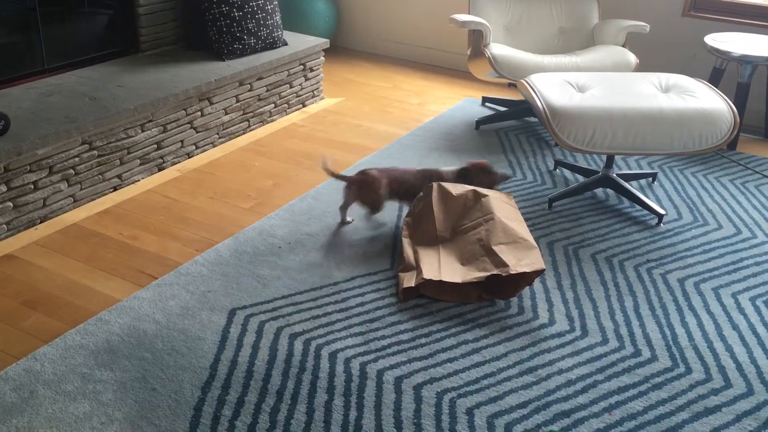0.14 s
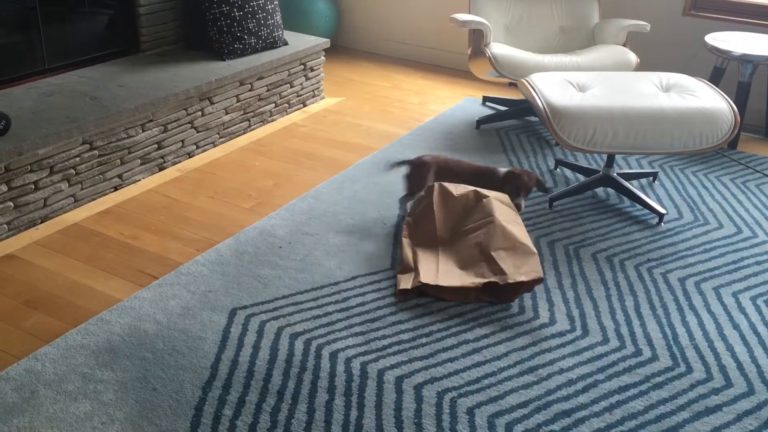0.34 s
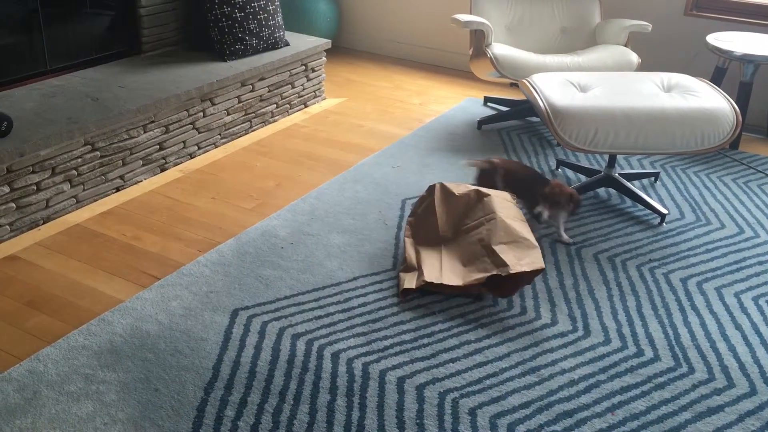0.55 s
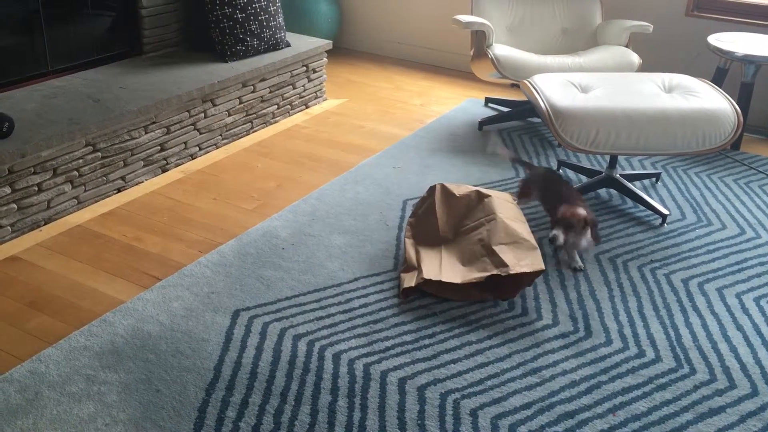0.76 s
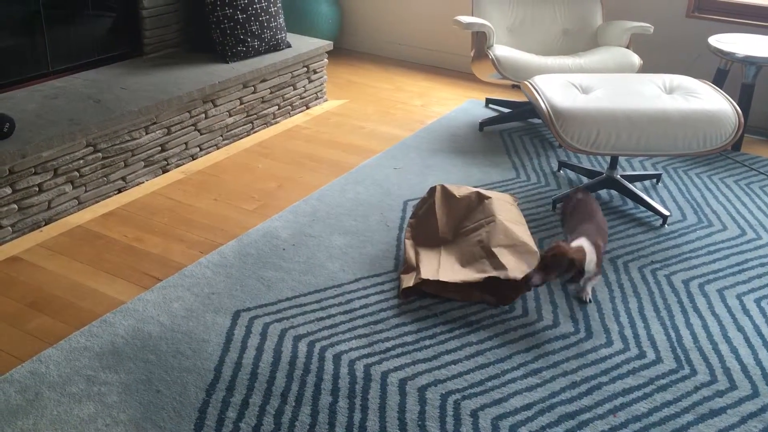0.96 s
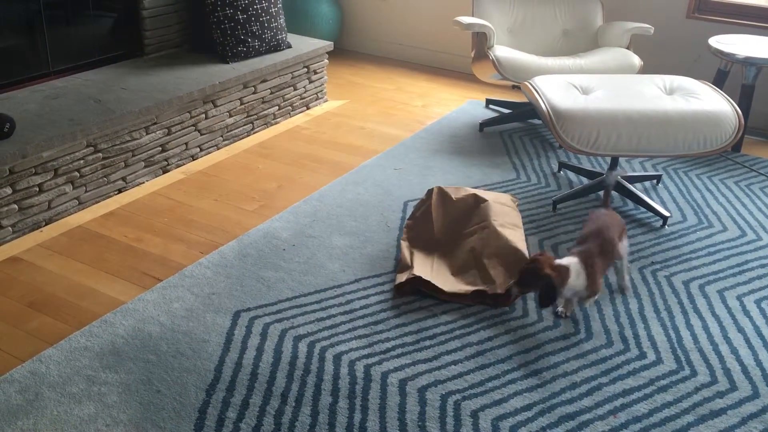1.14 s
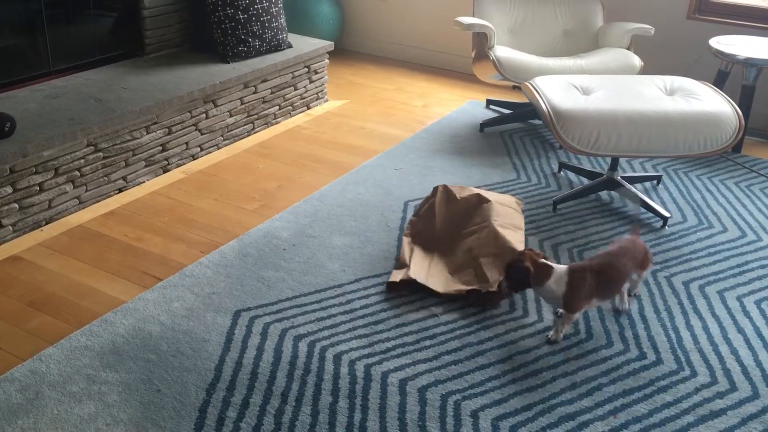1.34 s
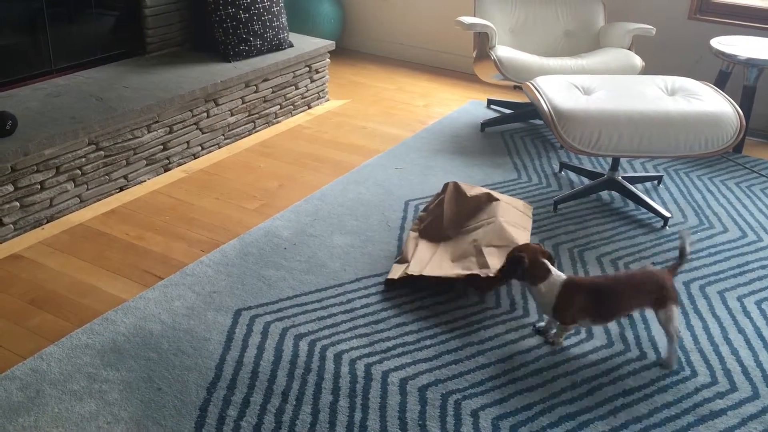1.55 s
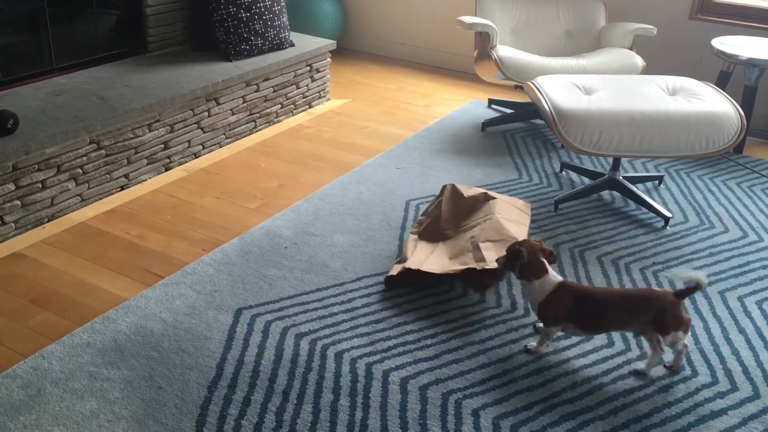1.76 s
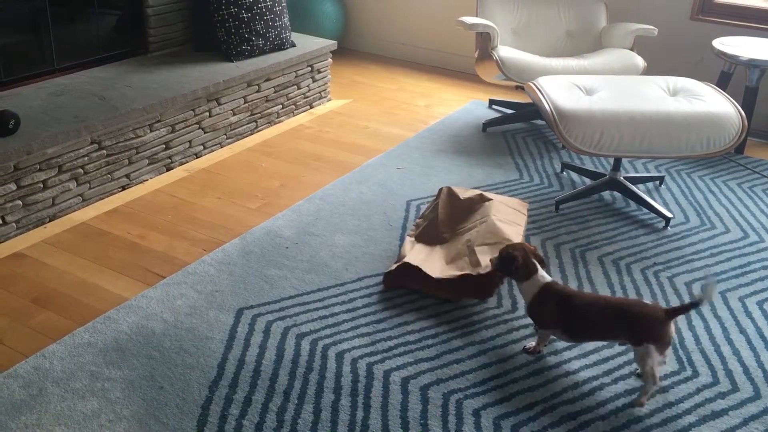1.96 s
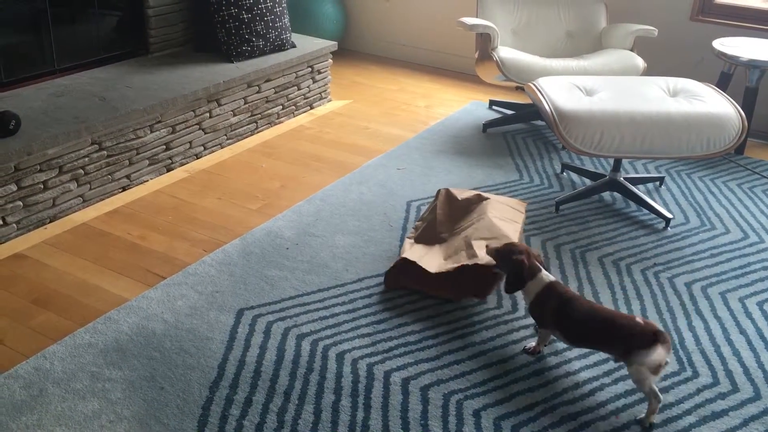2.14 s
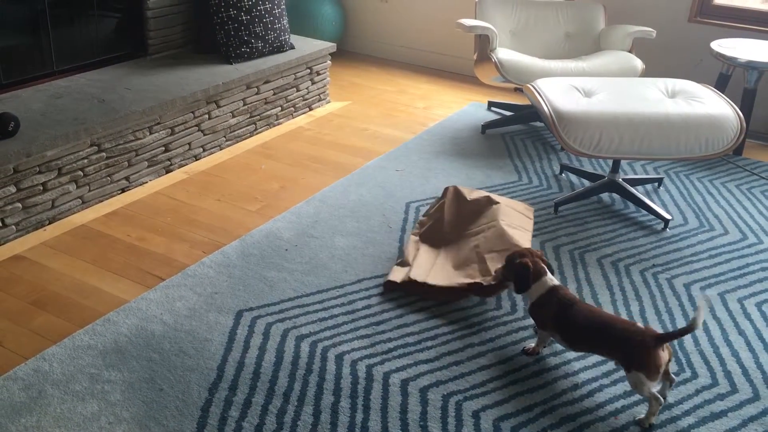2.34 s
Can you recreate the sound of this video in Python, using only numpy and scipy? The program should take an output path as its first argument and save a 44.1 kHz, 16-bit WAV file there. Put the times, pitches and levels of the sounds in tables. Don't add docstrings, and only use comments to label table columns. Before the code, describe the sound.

Single piercing puppy yap echoes in a hard room, followed by sniffing and paper bag crackling

```python
import sys
import numpy as np
from scipy import signal
from scipy.fft import rfft, irfft
from scipy.io import wavfile
from scipy.ndimage import uniform_filter1d

SR = 44100
rng = np.random.default_rng(int(sys.argv[2]) if len(sys.argv) > 2 else 0)


def master(y):
    cut = np.clip(np.atleast_2d(y).T, -1, 1)
    pcm = np.round(cut * 32767)
    wavfile.write(sys.argv[1], SR, pcm.astype(np.int16))


def attenuation_scalar(level_db):
    decades = np.asarray(level_db, float) / 20
    return 10 ** decades


N = 105840

# [f/Hz, level/dB]
AIR_COLOUR = [(20, -36), (45, -1.5), (90, -4.5), (250, -8.5), (700, -23), (2200, -16.5), (4500, -32.5),
              (15800, -42)]
AIR_DB = -57
# [t/s, level/dB]
STIR = [(0, 7), (.12, 0.5), (.25, -2.5), (.4, 3), (.7, 0.5), (.86, -3), (1.1, 3), (1.6, -3), (2.4, 0)]
OLD_YAP_HZ, OLD_YAP_WIDTH_HZ, OLD_YAP_DB, OLD_YAP_T60_S = 1720, 75, -50, 0.5

# [t/s, level/dB]
SWISH = [(0, -61.5), (.15, -76.5), (.4, -69), (.8, -67.5), (.86, -94.5), (.92, -80), (1.1, -63),
         (1.22, -59), (1.38, -61), (1.52, -55), (1.56, -71), (1.72, -60.5), (1.8, -104), (1.97, -59),
         (2.07, -76.5), (2.18, -92), (2.3, -70), (2.4, -66.5)]
# [f/Hz, level/dB]
PILE_COLOUR = [(1500, -2.5), (4000, -1), (9000, -4.5), (15800, -9)]
CLAW_S, CLAW_DB = .403, -47

# [t/s, peak level/dB, pitch f/Hz, time to fall 60 dB/s]
THUDS = [(0.022, -50.5, 61.8, 0.21), (0.101, -40.5, 58.4, 0.08), (0.339, -53.5, 202, .25),
         (0.498, -52, 71.5, 0.21), (0.572, -49.5, 84.7, 0.17), (1.087, -53.5, 224, 0.62),
         (1.43, -58.5, 109, 0.23), (1.606, -45.5, 289, 0.74), (1.606, -49, 139, 0.16),
         (1.661, -52, 400.6, 0.34), (1.987, -53, 176, 0.2), (2.305, -56.5, 276, 0.21)]
# [t/s, level/dB]
SCUFF = [
    (.22, -88.5),
    (.33, -51),
    (.62, -55.5),
    (.8, -66.5),
    (1.0, -74.5),
    (1.2, -88),
]
PUSH, PUSH_S, THUD_RISE_S = 1.5, .005, 0.0035

# [t/s, level/dB]
DRAG = [(.9, -104.5), (1.05, -59.5), (1.12, -50), (1.35, -55), (1.58, -54.5), (1.63, -42), (1.8, -57.5),
        (2.02, -46.5), (2.15, -58.5), (2.33, -46.5), (2.4, -51.5)]
# [f/Hz, level/dB]
RUSTLE_COLOUR = [(80, -14.5), (150, -11), (330, -7), (1100, -9), (2300, -20), (5000, -24.5), (15800, -47.5)]
GRAINS_PER_S, GRAIN_SPREAD_DB = 2300, 2.5

# [t/s, peak level/dB, pitch f/Hz, time to fall 60 dB/s]
SNAPS = [(1.0502, -36, 2500, 0.048), (1.0607, -28.5, 3650, 0.085), (1.0934, -32.5, 1180, 0.055),
         (1.2313, -36.5, 3120, 0.084), (1.4299, -40.5, 7900, 0.049), (1.5231, -39, 1110, 0.073),
         (1.5611, -38, 1286, 0.048), (1.5994, -45.5, 1160, 0.042), (1.6056, -26, 1290, 0.04),
         (1.637, -27.5, 1140, 0.082), (1.3004, -48, 2085, 0.031), (1.665, -44.5, 982, 0.044),
         (1.7068, -39, 1120, 0.089), (1.8835, -36, 3470, 0.048), (1.9612, -35.5, 4030, .08),
         (1.9682, -34, 1330, 0.14), (2.003, -30.5, 5500, 0.096), (2.027, -39, 5500, 0.075),
         (2.181, -35.5, 860, 0.14), (2.2472, -37.5, 2430, .035), (2.2703, -33, 3390, 0.082),
         (2.2969, -34, 1680, 0.1), (2.3142, -26.5, 1280, 0.075), (2.322, -33.5, 6000, 0.055),
         (2.3375, -27, 1640, .08), (2.3514, -32.5, 1200, 0.085), (2.376, -36.5, 1730, 0.068)]
# [f/Hz, level/dB]
PAPER_COLOUR = [(200, -53), (600, 5.5), (1300, 2.5), (3500, -0.5), (7000, -13), (15800, -32)]
SNAP_RISE_S, SNAP_RING = .0006, 0.66
TICK, TICK_S = .9, .002

# [start t/s, length/s, from f/Hz, to f/Hz, level/dB]
WHISTLES = [(.011, 0.022, 5830, 5070, -50), (.017, 0.025, 9820, 9560, -53.5),
            (.024, 0.0065, 12350, 10540, -54), (.15, 0.053, 5050, 5050, -67.5),
            (.194, 0.03, 12870, 13100, -44), (.26, 0.052, 6080, 6790, -42), (.902, .042, 4956, 5500, -46.5),
            (.905, .036, 9880, 11540, -61.5), (.986, 0.029, 15360, 15200, -60.5),
            (.956, 0.027, 5630, 5380, -49), (.984, 0.03, 5300, 5130, -51), (.85, 0.0086, 6320, 5500, -68.5)]
WHISTLE_FLUTTER = .45
# [t/s, pitch f/Hz, level/dB]
SQUEAK = [(.953, 11120, -79), (.959, 11270, -39), (0.968, 11000, -35), (.976, 11120, -35.5),
          (.984, 11100, -49.5), (0.992, 9920, -51.5), (1.004, 9570, -46), (1.013, 9500, -65)]
# [start t/s, length/s, level/dB]
SNIFFS = [
    (.0, 0.057, -52.5),
    (.19, 0.02, -45.5),
    (0.215, 0.031, -39.5),
    (0.901, 0.072, -56.5),
    (0.942, 0.11, -47.5),
    (1.06, 0.3, -60),
]
# [f/Hz, width/Hz, level/dB]
NOSTRILS = [(1430, 680, 10), (3280, 97, 14), (5500, 520, -14.5), (11500, 830, -21.5)]

# [t/s, pitch f/Hz, level/dB, overtone level/dB, break-up level/dB]
YAP = [
    (0.201, 1740, -54.5, -26, -45.5),
    (0.209, 1857, -7.5, -23, -45.5),
    (0.212, 1898, -12, -17.5, -33.5),
    (0.236, 1901, -7, -12.5, -17),
    (0.245, 1909, -7.5, -17.5, -14.5),
    (0.257, 1950, -12.5, -8, -5.5),
    (0.279, 2032, -22.5, -18, -7.5),
    (0.292, 1825, -10, -37.5, -21),
    (0.301, 1720, -55.5, -38, -24.5),
]
# [multiple of the pitch, level/dB, share of the break-up it follows]
OVERTONES = [(2, 3, 0), (3, -12, 0), (4, -26, .5), (5, -24, .05), (6, -35, .2), (7, -30, .1)]
SHAKE = .25
HALF_DB, THREE_HALF_DB = -14, -21
# [f/Hz, level/dB]
RASP_COLOUR = [(2590, -59), (4400, -33.5), (5940, 1.5), (6920, -10), (12500, -8.5), (15500, -22)]
RASP_S, RASP_RISE_S, RASP_FALL_S, RASP_PEAK_DB = .272, .036, 0.028, -37.5
# [f/Hz, level/dB]
YAP_COLOUR = [(650, -30), (880, 0), (21000, 0)]

# [f/Hz, time to fall 60 dB/s]
ROOM_T60 = [(100, 2.4), (500, 1.3), (1000, 2.01), (1900, 1.985), (3800, 1.14), (6000, 0.9), (11000, 0.59),
            (16000, 0.58)]
# [delay t/s, level/dB]
ECHOES = [(.005, -26), (0.046, -14.5), (.066, -15.5), (.088, -7.5), (0.147, -19), (.212, -22)]
# [delay t/s, level/dB]
HALL = [(0, 1.5), (.2, -3), (.27, -4.5), (.41, -0.5), (.5, 3), (.75, 1), (.95, -1), (1.08, 0.5), (1.15, 6)]
# [f/Hz, level/dB]
WALLS = [(20, 3), (1000, -7), (1880, -5.5), (1960, -1.5), (3900, -11), (6200, -12), (7800, -8),
         (20000, -24.5)]
FAR_WALL_S, BUILD_S = 0.016, 0.027
SAG_DB = 12.5
WET_DB, NOSE_WET_DB, BAG_WET_DB = 1, 1, -1.5

THIN_FROM_HZ, THIN_TO_HZ, THIN_DB = 2290, 2680, -33
KNEE = 1.2


def evened(x):
    return x / np.sqrt(np.mean(x ** 2) + 1e-20)


def colour(x, points):
    f, level = np.transpose(points)
    hz = np.fft.rfftfreq(len(x), 1 / SR)
    gain = attenuation_scalar(np.interp(np.log(hz + 1), np.log(f + 1), level, -90, -90))
    return irfft(rfft(x) * gain, len(x))


def add(mix, s, sound):
    part = mix[round(max(s, 0) * SR):][:len(sound)]
    part += sound[:len(part)]


def resonate(x, hz, width):
    r = np.exp(-np.pi * width / SR)
    return 2 * signal.lfilter([1 - r], [1, -r * np.exp(2j * np.pi * hz / SR)], x).real


def follow(curve):
    s, level = np.transpose(curve)
    return attenuation_scalar(np.interp(np.arange(N) / SR, s, level, -120))


def air():
    z, t = rng.standard_normal((3, N)), np.arange(N) / SR
    ring = resonate(z[1], OLD_YAP_HZ, OLD_YAP_WIDTH_HZ)
    ring = evened(resonate(ring, OLD_YAP_HZ, OLD_YAP_WIDTH_HZ))
    lumps = follow(STIR) * attenuation_scalar(2.8 * evened(uniform_filter1d(z[2], size=3000)))
    tone = attenuation_scalar(AIR_DB) * lumps * evened(colour(z[0], AIR_COLOUR))
    return tone + attenuation_scalar(OLD_YAP_DB - 60 * t / OLD_YAP_T60_S) * ring


def swish():
    out = follow(SWISH) * evened(colour(rng.standard_normal(N), PILE_COLOUR))
    fade = attenuation_scalar(CLAW_DB - 60 * np.arange(400) / SR / .006)
    add(out, CLAW_S, fade * np.diff(rng.standard_normal(401)))
    return out


def paws():
    out, t = np.zeros(N), np.arange(8000) / SR
    for (s, db, hz, t60), noise in zip(THUDS, rng.standard_normal((len(THUDS), 8000))):
        shove = noise + PUSH * np.exp(-t / PUSH_S) * np.sin(2 * np.pi * hz * t)
        thud = resonate(shove, hz, 0.52 * hz)
        thud = evened(resonate(thud, hz, 0.52 * hz))
        add(out, s, attenuation_scalar(db - 60 * t / t60) * np.minimum(t / THUD_RISE_S, 1) * thud)
    scuff_colour = [(120, -1), (300, 1), (800, -0.5), (3000, -29.5)]  # f/Hz, level/dB
    return out + follow(SCUFF) * evened(colour(rng.standard_normal(N), scuff_colour))


def rustle():
    strength = attenuation_scalar(GRAIN_SPREAD_DB * np.minimum(rng.exponential(1, N), 5))
    grains = strength * (rng.random(N) < GRAINS_PER_S / SR)
    grains = grains * rng.choice([-1., 1.], N)
    return follow(DRAG) * evened(colour(grains, RUSTLE_COLOUR))


def snaps():
    out, t = np.zeros(N), np.arange(4096) / SR
    for (s, db, hz, t60), z in zip(SNAPS, rng.standard_normal((len(SNAPS), 2, 4096))):
        clicks = evened(colour(z[0] * abs(z[1]), PAPER_COLOUR))
        clicks = clicks + SNAP_RING * evened(resonate(clicks, hz, 500 + 0.04 * hz))
        fade = attenuation_scalar(-60 * t / t60) + TICK * np.exp(-t / TICK_S)
        clicks = np.minimum(t / SNAP_RISE_S, 1) * fade * clicks
        add(out, s - SNAP_RISE_S, attenuation_scalar(db) * clicks / abs(clicks).max())
    return out


def nose():
    out, puffs = np.zeros(N), np.zeros(N)
    for s, length, hz0, hz1, db in WHISTLES:
        u = np.arange(0, 1, 1 / (length * SR))
        tone = np.sin(2 * np.pi * np.cumsum(hz0 + (hz1 - hz0) * u) / SR)
        add(out, s, attenuation_scalar(db) * 1.32 * np.sin(np.pi * u) ** 1.4 * tone)
    s, hz, level = np.transpose(SQUEAK)
    t = np.arange(s[0], s[-1], 1 / SR)
    squeak = np.sin(2 * np.pi * np.cumsum(np.interp(t, s, hz)) / SR)
    add(out, s[0], attenuation_scalar(np.interp(t, s, level)) * np.sqrt(2) * squeak)
    flutter = evened(uniform_filter1d(rng.standard_normal(N), size=90))
    out = out * (1 + WHISTLE_FLUTTER * flutter)
    for s, length, db in SNIFFS:
        add(puffs, s, attenuation_scalar(db) * np.sin(np.pi * np.arange(0, 1, 1 / (length * SR))))
    breath = rng.standard_normal(N)
    hiss = sum(attenuation_scalar(db) * resonate(breath, hz, width) for hz, width, db in NOSTRILS)
    return out + puffs * evened(hiss)


def yap():
    rows = np.transpose(YAP)
    t = np.arange(rows[0, 0], rows[0, -1], 1 / SR)
    curves = (uniform_filter1d(np.interp(t, rows[0], col), size=151) for col in rows[1:])
    hz, level, over, broken = curves
    noise = rng.standard_normal((2, 8192))
    phase = 2 * np.pi * np.cumsum(hz) / SR
    wobble = evened(uniform_filter1d(noise[0], size=60))[:len(t)]
    shake = SHAKE * attenuation_scalar(broken + 3.5) * wobble
    overtones = sum(attenuation_scalar(db + share * (broken + 4)) * np.cos(k * phase + (k - 1) * shake)
                    for k, db, share in OVERTONES)
    voice = np.sin(phase) - attenuation_scalar(over) * overtones
    half_tones = attenuation_scalar(HALF_DB) * np.sin(phase / 2)
    half_tones += attenuation_scalar(THREE_HALF_DB) * np.sin(3 * phase / 2 + 8 * shake)
    voice += attenuation_scalar(broken) * half_tones
    u = t[0] + np.arange(8192) / SR - RASP_S
    rush = np.exp(-(u / np.where(u < 0, RASP_RISE_S, RASP_FALL_S)) ** 2)
    rasp = attenuation_scalar(RASP_PEAK_DB) * rush * evened(colour(noise[1], RASP_COLOUR))
    out = np.zeros(N)
    add(out, t[0], attenuation_scalar(level) * np.sqrt(2) * voice)
    add(out, t[0], rasp)
    return colour(out, YAP_COLOUR)


def room(x):
    size = 2 * SR
    taps = np.zeros(size)
    at = np.arange(400, size - 20, 20) + rng.integers(0, 20, (size - 401) // 20)
    taps[at] = rng.choice([-1., 1.], len(at))
    hz, t, z = signal.stft(taps, SR, nperseg=256)
    f, t60 = np.transpose(ROOM_T60)
    ring_s = np.interp(np.log(hz + 1), np.log(f), t60)[:, None]
    swell = np.interp(t, *np.transpose(HALL))
    fade = attenuation_scalar(-60 * t / ring_s - SAG_DB * t ** 2 + swell)
    tail = signal.istft(z * fade, SR, nperseg=256)[1]
    tail = tail * np.clip((np.arange(len(tail)) / SR - FAR_WALL_S) / BUILD_S, .08, 1)
    tail = tail / np.linalg.norm(tail)
    for s, db in ECHOES:
        add(tail, s, attenuation_scalar(np.array([db - WET_DB])))
    return colour(signal.fftconvolve(x, tail), WALLS)[:N]


def thinned(x):
    hz, t, z = signal.stft(x, SR, nperseg=1024, noverlap=768)
    band = (hz > THIN_FROM_HZ) & (hz < THIN_TO_HZ)
    power = uniform_filter1d(abs(z) ** 2, size=5, axis=-1)
    faint = power[:, band].sum(1) < power.sum(1) * attenuation_scalar(2 * THIN_DB)
    gain = 1 - .93 * band[:, None] * faint[:, None]
    return signal.istft(z * gain, SR, nperseg=1024, noverlap=768)[1][:, :N]


def scene():
    voice, whistle, bag = yap(), nose(), snaps() + rustle()
    wet = room(attenuation_scalar(WET_DB) * voice + attenuation_scalar(NOSE_WET_DB) * whistle + attenuation_scalar(BAG_WET_DB) * bag)
    return (voice + whistle + bag + wet + paws() + air() + swish())[None]


def band_limit(x):
    return signal.sosfilt(signal.butter(12, 15740, fs=SR, output="sos"), x)


def record(dry):
    cut = signal.sosfilt(signal.butter(2, 35, "high", fs=SR, output="sos"), dry)
    squashed = cut / (1 + (cut / KNEE) ** 4) ** 0.063
    return band_limit(thinned(squashed))


dry = scene()
out = record(dry)
master(out)
```